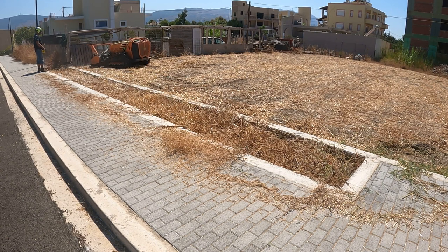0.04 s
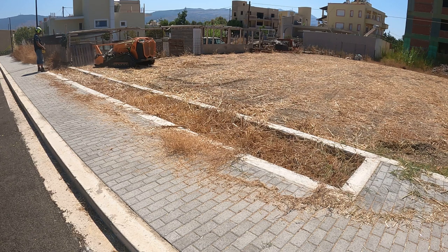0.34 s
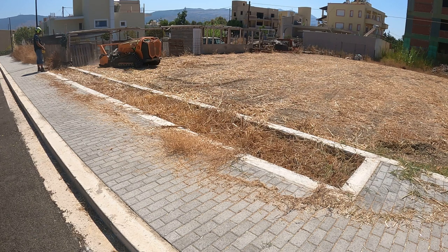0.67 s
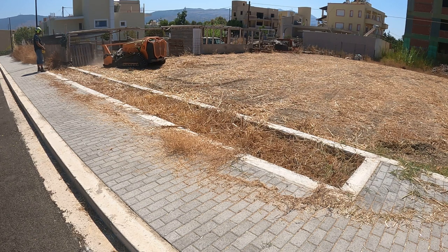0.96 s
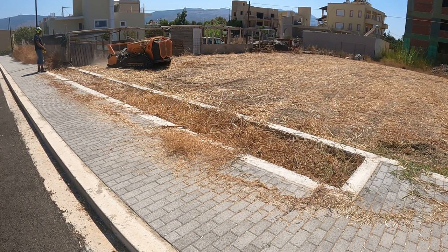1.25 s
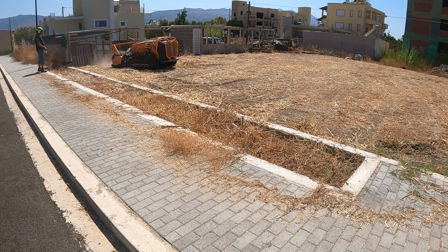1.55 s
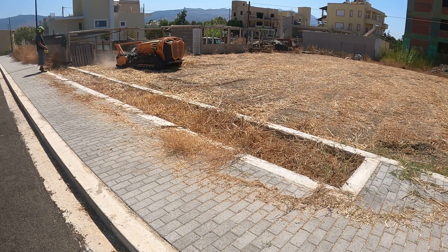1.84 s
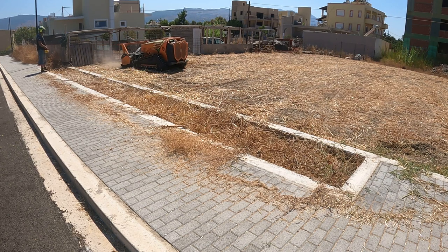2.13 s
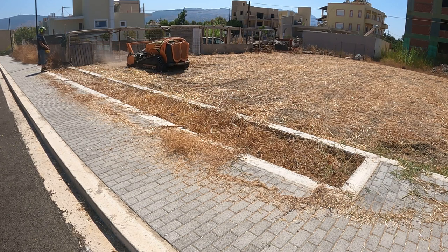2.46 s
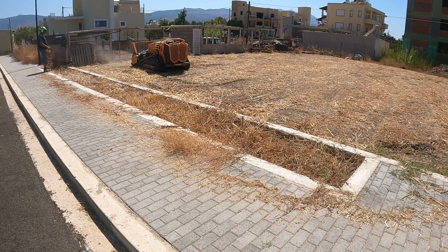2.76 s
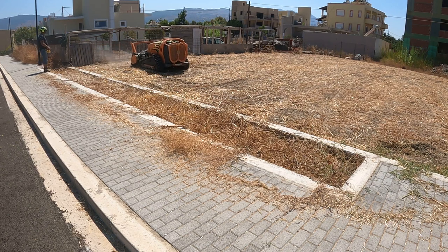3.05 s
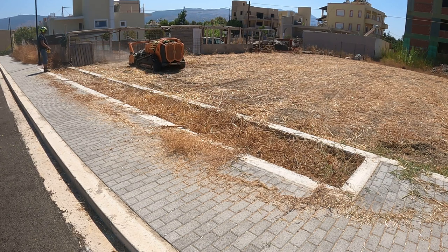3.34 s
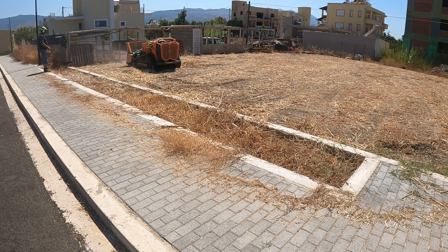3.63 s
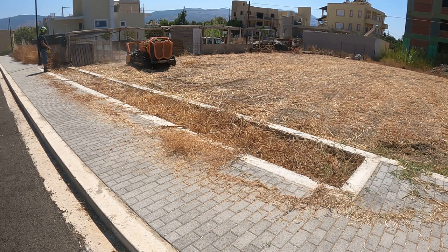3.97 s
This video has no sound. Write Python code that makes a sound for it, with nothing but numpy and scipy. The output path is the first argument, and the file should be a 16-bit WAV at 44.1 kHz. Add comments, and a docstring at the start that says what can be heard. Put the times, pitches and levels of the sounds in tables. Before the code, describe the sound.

A tracked mower runs some way off outdoors, its thudding engine drone and rough roar steady for all four seconds. Dry stalks crackle, with debris knocking near 0.5 and 1.6 seconds and a sharp crack at about 1.5 seconds. The blades' hum fades from around 2.3 seconds and the cutting grows quieter while the engine carries on. Light gusts bump the microphone in the first second and a half.

```python
"""A thudding drone and a rough roar: a tracked mower works through dry grass, some way off.
Its three-cylinder engine puffs out exhaust, and the spinning cutting rotor hums and churns the air;
the hum fades as the machine turns. Stalks snap and debris rattles in the deck (the housing around
the blades), while a breeze bumps the microphone."""
import sys
import numpy as np
from scipy import signal
from scipy.fft import rfft, irfft
from scipy.io import wavfile

SR = 44100
rng = np.random.default_rng(int(sys.argv[2]) if len(sys.argv) > 2 else 0)


def materialize(psi):
    """Save the field psi as 16-bit PCM at rate SR to the path in sys.argv[1].

    A 1-D psi becomes a single channel; in a 2-D psi each row is a channel.
    """
    bounded = np.clip(np.atleast_2d(psi).T, -1, 1)
    quanta = np.round(bounded * 32767).astype(np.int16)
    wavfile.write(sys.argv[1], SR, quanta)


N = 176400  # 4 seconds


def amp(db):
    """Turn decibels into a number to multiply by."""
    return 10 ** (np.asarray(db) / 20)


def unit(x):
    """Scale a signal to an average size (rms) of 1."""
    return x / np.sqrt(np.mean(x ** 2) + 1e-20)


def curve(table, column=1):
    """Join a time table's points with straight lines, giving one value per sample."""
    table = np.array(table)
    return np.interp(np.arange(N) / SR, table[:, 0], table[:, column])


def colour(x, points):
    """Set the balance of low and high frequencies (the tone colour); the result has rms 1."""
    size = 2 ** 14
    hz, db = np.transpose(points)
    grid_hz = abs(np.fft.fftfreq(size, 1 / SR))
    log_gain = np.log(amp(np.interp(np.log(grid_hz + 1), np.log(hz + 1), db)))
    response = np.exp(np.conj(signal.hilbert(log_gain)))  # rings after a click, not before
    taps = np.fft.ifft(response).real[:size // 2]
    return unit(irfft(rfft(x) * rfft(taps, N), N))


def drift(hz):
    """Random wandering with rms 1; a higher hz wanders faster."""
    smoothing = np.exp(-(np.fft.rfftfreq(N, 1 / SR) / hz) ** 2)
    return unit(irfft(rfft(rng.standard_normal(N)) * smoothing, N))


def bursts(table, attack_s, tail_s):
    """Loudness over time for events that rise, hold and die away."""
    t = np.arange(N) / SR
    return sum(amp(db) * np.clip((t - start) / attack_s, 0, 1)
               * np.exp(-np.maximum(t - start - length / 2, 0) / tail_s)
               for start, length, db in table)


def snaps(per_s=2500, spread_db=2.5):
    """A dense crackle of random clicks, uneven in size."""
    size = amp(spread_db * np.minimum(rng.exponential(1, N), 5))
    return size * rng.choice([-1, 1], N) * (rng.random(N) < per_s / SR)


def breeze():
    """Moving air bumps the microphone: a low rumble with a few gusts."""
    tone = [(5,-24),(20,-5),(32,0.5),(50,5),(75,-2),(120,-11.5),(300,-31.5),(1000,-67),(8000,-120)]  # rumble colour: f/Hz, level/dB
    gusts = [(.04, 0.091, -18), (.59, 0.11, -15.5), (.8, 0.13, -24), (1.31, 0.06, -23), (1.41, 0.11, -26)]  # t/s, length/s, relative level/dB
    level = amp(-32) + 0.8 * bursts(gusts, attack_s=0.023, tail_s=0.069)
    return colour(rng.standard_normal(N), tone) * level


def sizzle():
    """A thin, high sizzle that flutters and flares up now and then."""
    tone = [(10000,-66),(11300,-30),(11700,-17),(11810,-6),(11890,-10),(11990,0),(12100,-5),(12200,2),(12340,-10),(12500,-4),(12850,-16),(13100,-34),(14500,-74)]  # sizzle colour: f/Hz, level/dB
    loudness = [(0,-69),(1,-71),(1.4,-70),(1.6,-62),(1.75,-63),(2.05,-62),(2.3,-68),(2.75,-64),(3.2,-67),(4,-69)]  # t/s, level/dB
    flares = [(.72,0.1,-54),(.925,.11,-61),(1.47,.04,-42),(2.16,.06,-58),(3.425,0.15,-58),(3.83,.05,-63),(3.93,.12,-61)]  # t/s, length/s, level/dB
    level = amp(curve(loudness) + 2.8 * drift(hz=16)) + bursts(flares, attack_s=0.01, tail_s=0.014)
    return colour(rng.standard_normal(N), tone) * level


def metal_ring(pitch_hz=5028):
    """The machine's metal rings faintly, mostly in the first second and a half."""
    loudness = [(0,-54),(.7,-51),(1.2,-50),(1.6,-61),(4,-68)]  # t/s, level/dB
    phase = 2 * np.pi * pitch_hz * np.arange(N) / SR + 0.9 * drift(hz=22)
    return np.sqrt(2) * amp(curve(loudness) + 2 * drift(hz=15)) * np.sin(phase)


def swells(width_hz=20):
    """The drone swells briefly with a hollow sound: noise close to one pitch."""
    events = [(0.115,0.13,395,-29.5),(0.256,0.34,106,-23),(0.553,0.16,375,-30)]  # swell peaks: t/s, length/s, f/Hz, level/dB
    t = np.arange(N) / SR
    sound = np.zeros(N)
    for peak, length, hz, db in events:
        phase = 2 * np.pi * hz * t
        hollow = drift(width_hz) * np.cos(phase) + drift(width_hz) * np.sin(phase)
        sound += amp(db) * np.exp(-((t - peak) / length * 2) ** 2) * hollow
    return sound


def whines(firings):
    """Faint, wavering tones that follow the engine's speed."""
    multiples = [2.667, 5.6, 12, 16.56, 18.07, 26.45, 36]  # each whine's pitch divided by the firing rate
    levels = [-34.5, -44, -50.5, -52.5, -49, -53.5, -54]  # each whine's level/dB
    return sum(np.sqrt(2) * amp(db + 2.4 * drift(hz=4))
               * np.sin(2 * np.pi * multiple * firings + 0.69 * drift(hz=8.7))
               for multiple, db in zip(multiples, levels))


def cutting():
    """Stalks snap, clumps and debris hit the deck, grit flies and the rotor cracks something hard."""
    shred_tone = [(800,-35),(2300,-2),(4700,3),(6500,-4.5),(8000,-6),(9200,-16.5),(10400,-18),(11200,-31),(14000,-40),(16000,-61)]  # colour of snapping stalks: f/Hz, level/dB
    shred_level = [(0, -48), (.45, -40), (.6, -43.5), (.8, -39), (1.1, -43.5), (1.35, -45), (1.55, -38.5),
                   (1.75, -46), (2.3, -48.5), (4, -50.5)]  # t/s, level/dB
    stalks = colour(snaps(), shred_tone) * amp(curve(shred_level) + 1.6 * drift(hz=25))

    clump_hits = [(.46,0.026,-34),(.825,.012,-36),(.857,0.042,-30),(1.4,0.039,-35),(1.5,0.029,-33),(1.551,0.02,-34.5),(1.592,0.025,-39)]  # t/s, length/s, level/dB
    clumps = colour(snaps(), shred_tone) * bursts(clump_hits, attack_s=0.005, tail_s=0.016)

    knock_tone = [(600,-24),(1500,-5),(2400,7),(3300,-8),(6000,-19),(12000,-55)]  # dull colour of debris: f/Hz, level/dB
    knock_hits = [(.46,0.028,-26),(1.595,0.025,-31),(1.625,0.032,-30)]  # t/s, length/s, level/dB
    knocks = colour(snaps(), knock_tone) * bursts(knock_hits, attack_s=0.004, tail_s=0.013)

    grit_tone = [(2000, -35), (5500, -12), (7200, 9), (10000, -11), (14000, -18), (16000, -22)]  # sharp colour of grit: f/Hz, level/dB
    grit_hits = [(1.296,.003,-48),(2.503,0.004,-37.5),(2.549,.008,-45)]  # t/s, length/s, level/dB
    grit = colour(rng.standard_normal(N), grit_tone) * bursts(grit_hits, attack_s=0.0006, tail_s=0.003)

    crack_tone = [(800,-26),(2300,5),(4000,-2),(5000,0),(6000,-2),(8000,-4),(9200,-16),(10500,-16),(11500,-27),(14000,-33),(16000,-60)]  # colour of the hard hit: f/Hz, level/dB
    crack_hit = [(1.453, .03, -21)]  # t/s, length/s, level/dB
    crack = colour(rng.standard_normal(N), crack_tone) * bursts(crack_hit, attack_s=0.012, tail_s=0.0051)
    return stalks + clumps + knocks + grit + crack


def roar(firings):
    """The rotor and fan churn the air, throbbing a little with the engine, over the deck's low boom."""
    air_tone = [(260,-40),(450,-12.5),(520,-14.5),(600,-12),(700,-7),(850,-7.5),(1150,-8),(1370,-8),(1960,-11),(2430,-10),(3400,-14),(3800,-19),(4500,-20),(5400,-23.5),(6800,-31),(7600,-33.5),(8600,-39),(9100,-43.5),(10400,-49),(11200,-63),(14000,-59),(15700,-70)]  # colour of churned air: f/Hz, level/dB
    air_level = [(0,-28.5),(.3,-26.5),(.5,-27.5),(.65,-26.5),(.98,-26),(1.3,-28),(1.6,-29),(2,-30),(2.45,-31.5),(2.9,-30.5),(3.18,-29.5),(3.5,-30.5),(4,-31)]  # t/s, relative level/dB
    boom_tone = [(20,-36.5),(70,-0.5),(120,-0.5),(190,-1.5),(250,-4.5),(340,-5),(400,-10.5),(460,-20),(600,-24),(1200,-60.5),(8000,-110)]  # colour of the deck: f/Hz, level/dB
    boom_level = [(0,-25),(.6,-24),(1,-25),(1.5,-25),(2.1,-27),(2.8,-29),(3.3,-27.5),(4,-28)]  # t/s, level/dB
    throb = (1 + 0.037 * np.cos(2 * np.pi * firings)) * amp(0.49 * drift(hz=60))
    air = colour(rng.standard_normal(N) * throb, air_tone) * amp(curve(air_level) + 0.46)
    boom = colour(rng.standard_normal(N), boom_tone) * amp(curve(boom_level))
    return air + boom


def rotor(firings, passes_per_firing=6.946):
    """Blades driven by the engine sweep past, humming at 1, 2 and 3 times their passing rate."""
    hum_levels = [(0,-27,-37.5,-43),(.3,-25.5,-34,-38.5),(.7,-29,-33.5,-43),(1.05,-25,-31,-38.5),(1.5,-24,-36,-40.5),(1.9,-24.5,-34.5,-45),(2.3,-29.5,-35.5,-57),(2.75,-42,-39.5,-53),(3.05,-36,-42.5,-54),(3.3,-34.5,-39,-49),(3.65,-32,-42,-42.5),(4,-41.5,-55,-50)]  # t/s, then level/dB for each of the three tones
    phase = 2 * np.pi * passes_per_firing * firings + 0.14 * drift(hz=18)
    return sum(np.sqrt(2) * amp(curve(hum_levels, k) + 0.65 * drift(hz=9.3)) * np.sin(k * phase)
               for k in (1, 2, 3))


def exhaust(firings, spread_db=0.67, jitter_s=0.0001):
    """Each firing of a cylinder makes one puff; its colour changes as the machine turns."""
    cylinders = [1.5, 0.5, -1.3]  # three unequal cylinders: relative level/dB
    puff_tone = [(15,-39,-30.5),(49.7,-4.5,-6),(101,-1.5,2),(155,2.5,2),(203,1,-10),(259,-4.5,-7.5),(303,-5,-13.5),(392,-31.5,-25.5),(526,-30.5,-31),(710,-32,-28.5),(1510,-49,-45.5),(8000,-100,-100)]  # puff colour: f/Hz, side-on level/dB, turned level/dB
    course = [(0,-23,0.88),(.4,-25.5,1),(.75,-24.5,0.24),(1.3,-21.5,.03),(1.8,-23,0.2),(2.2,-20.5,0.66),(2.7,-21.5,0.91),(3.2,-22,.9),(3.65,-21,0.78),(4,-22,0.55)]  # the mower on the move: t/s, level/dB, heading (0 side-on, 1 turned)
    starts = np.flatnonzero(np.diff(np.floor(firings)))  # wherever the count passes a whole number
    strength, delay = rng.standard_normal((len(starts), 2)).T
    starts += np.round(delay * jitter_s * SR).astype(int)
    pulses = np.zeros(N)
    pulses[starts % N] = amp(np.resize(cylinders, len(starts)) + spread_db * strength)
    side_on = colour(pulses, np.array(puff_tone)[:, [0, 1]])
    turned = colour(pulses, np.array(puff_tone)[:, [0, 2]])
    heading = curve(course, 2)
    return ((1 - heading) * side_on + heading * turned) * amp(curve(course))


def scene():
    """Add the mower and the breeze together in one channel."""
    engine_speed = [(0, 50.91), (0.3, 50.86), (0.7, 50.88), (0.9, 51.09), (1.15, 50.91), (1.7, 50.99),
                    (2.1, 51.23), (2.55, 51.02), (2.9, 51.46), (3.08, 51.2), (3.3, 50.15), (3.45, 50.4),
                    (3.7, 50.86), (4, 50.95)]  # t/s, firing rate/Hz
    firings = np.cumsum(curve(engine_speed)) / SR  # running count of cylinder firings
    machine = exhaust(firings) + whines(firings) + rotor(firings) + roar(firings)
    return (machine + swells() + metal_ring() + cutting() + sizzle() + breeze())[None]


def record(dry):
    """Cut away the very highest treble."""
    cutoff_hz = 15700
    low_pass = signal.firwin(511, cutoff_hz, window=("kaiser", 9), fs=SR)
    return signal.oaconvolve(dry, low_pass[None], "same")


dry = scene()
out = record(dry)
materialize(out)
```